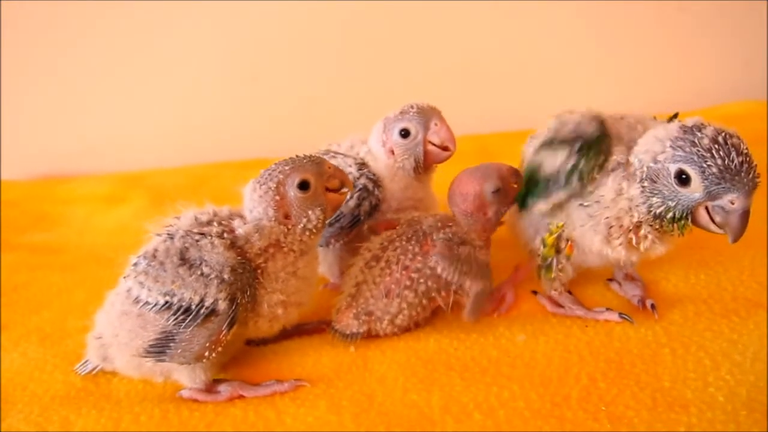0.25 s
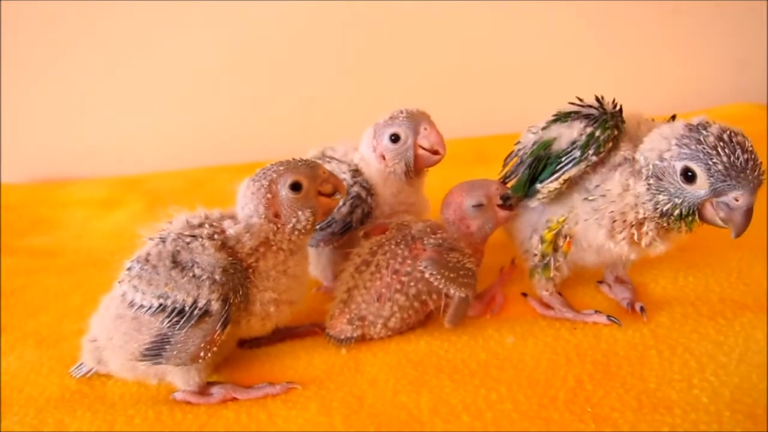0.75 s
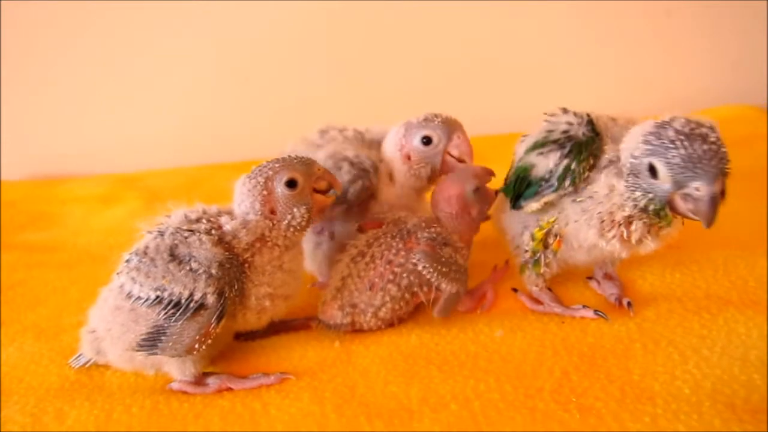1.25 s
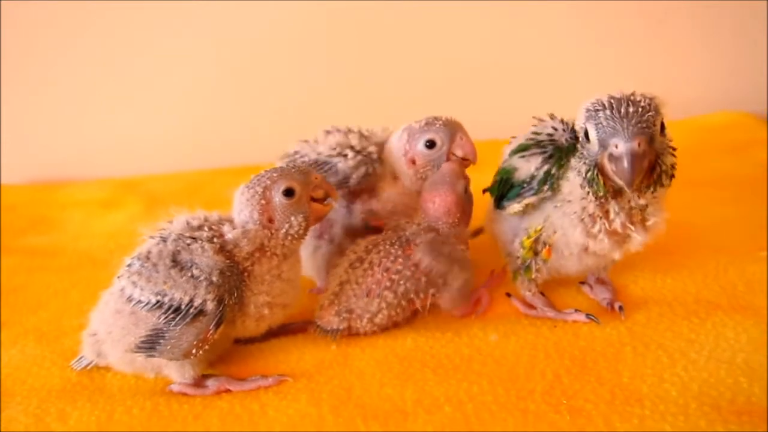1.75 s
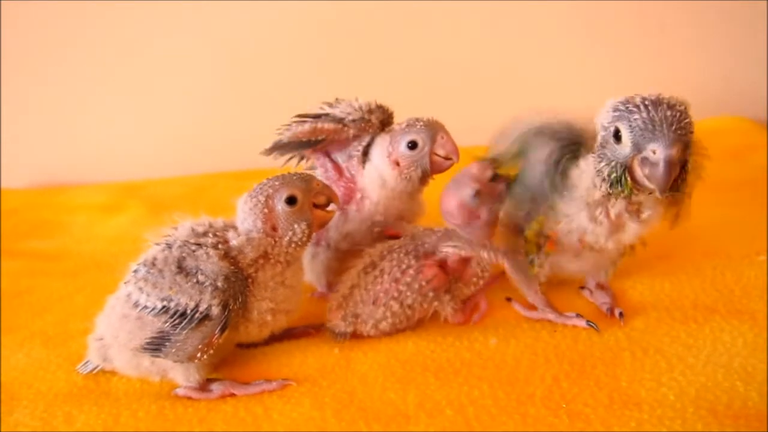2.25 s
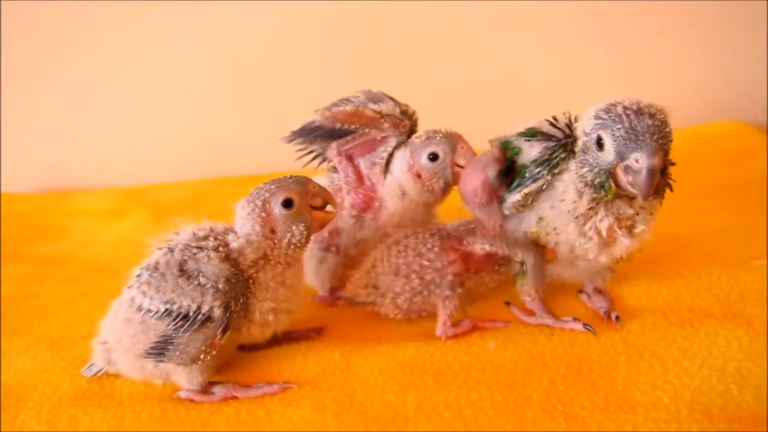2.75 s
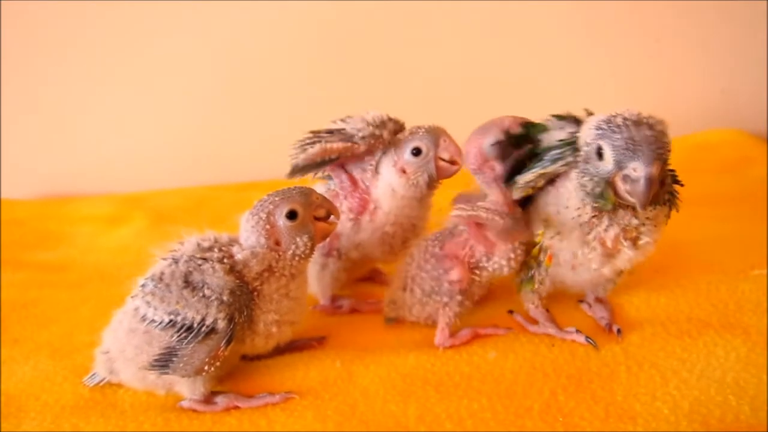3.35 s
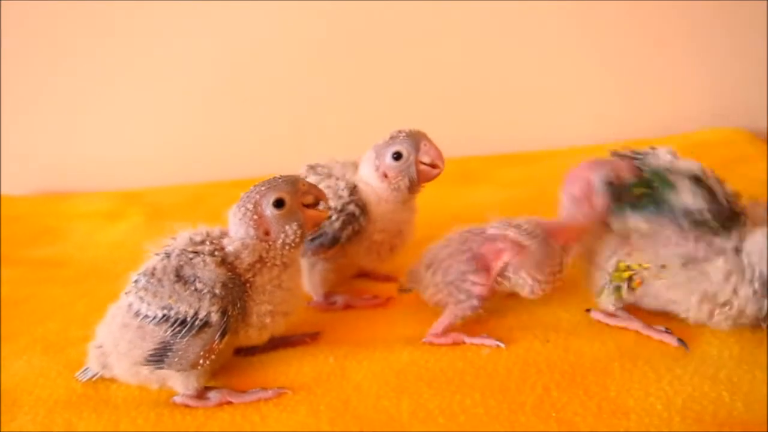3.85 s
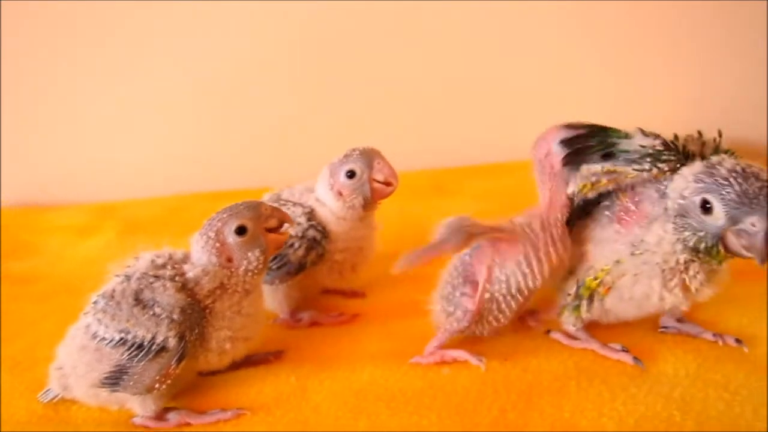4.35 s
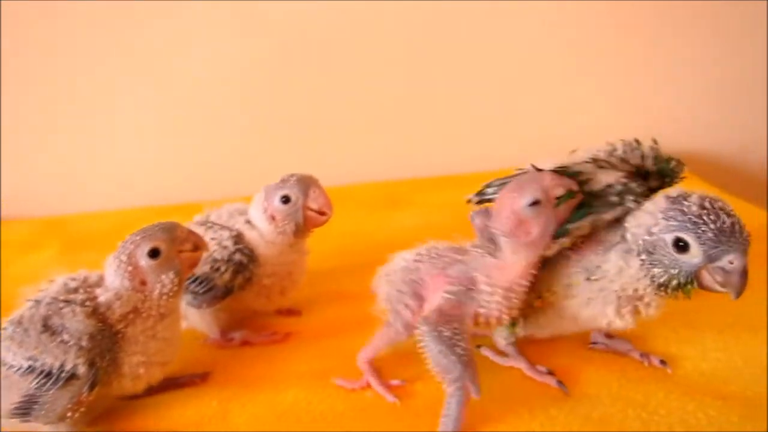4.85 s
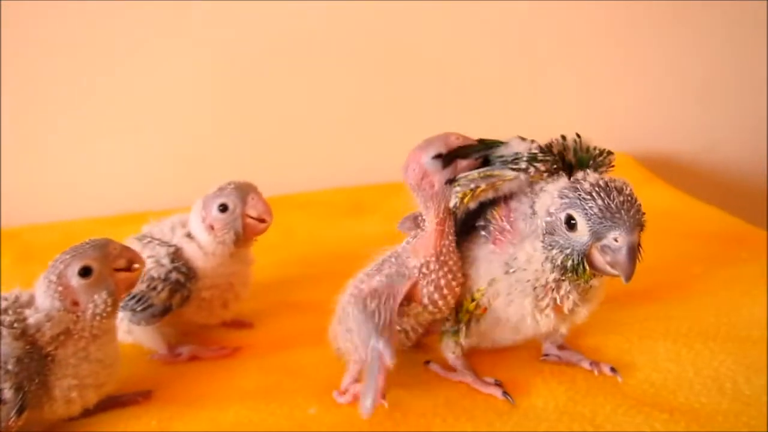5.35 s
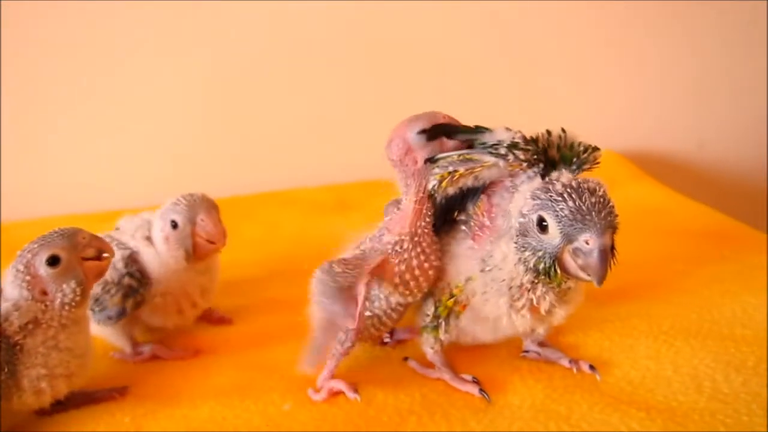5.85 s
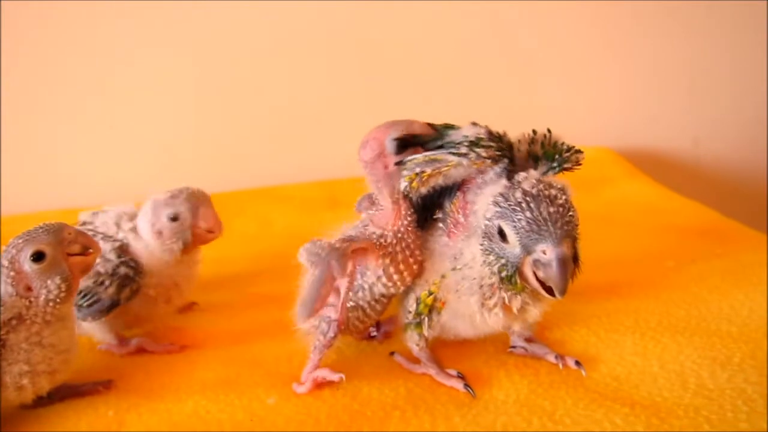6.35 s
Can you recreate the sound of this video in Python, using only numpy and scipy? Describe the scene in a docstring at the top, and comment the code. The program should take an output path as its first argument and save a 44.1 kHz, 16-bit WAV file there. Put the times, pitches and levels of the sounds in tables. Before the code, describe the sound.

Close, bright stereo sound of parrot chicks begging in a small, quiet room with a short reflective tail. From 0 to 0.5 s, five harsh, hoarse squeals fire off, each under a tenth of a second, sweeping up to a very high peak and falling. After a pause, four more raspy ones come at 0.97-1.3 s. At 1.72 s a long unbroken run begins, about nine squeals per second until 5.05 s, gradually clearing into thin, fluttering whistles with brief croaky onsets. Between roughly 2 and 4.3 s, faint low peeps fill the gaps. Soft cloth thuds with tiny claw ticks occur near 3.6 and 4.0 s. After a short silence, squeals resume at 5.46 s, four quick ones and then less evenly spaced, slightly rougher towards 6.6 s; light bumps come around 5.6-5.7 and 6.3 s. Low room rumble, hiss and faint hum lie underneath.

```python
"""Begging parrot chicks in a small room

Quick runs of short, arched squeals, hoarse at first and then clearer: each a frequency-modulated
oscillator plus breath noise, opened by a rattling croak, climbing to a whistle that flutters at its
highest pitch, then dropping away. A throat filter colours it; near surfaces and a noise tail answer.
Faint peeps fill some gaps, decaying noise makes bumps on a blanket; the room hisses and hums faintly."""
import sys
import numpy as np
from scipy import signal
from scipy.fft import rfft, irfft, next_fast_len
from scipy.io import wavfile
from scipy.ndimage import uniform_filter1d, map_coordinates

SR = 44100
rng = np.random.default_rng(int(sys.argv[2]) if len(sys.argv) > 2 else 0)


def generate_wav(sig):
    """Save sig (samples, or channels by samples) to the path in sys.argv[1] as 16-bit PCM at SR."""
    pcm = np.round(np.clip(np.atleast_2d(sig).T, -1, 1) * 32767).astype(np.int16)
    wavfile.write(sys.argv[1], SR, pcm)


N = 291942

# squeals: [start t/s, length/s, crest f/Hz, relative crest level/dB]
SQUEAL_LIST = [(.038, 0.081, 5980, -11), (0.13, 0.077, 6210, -10.5), (0.225, .074, 6155, -12.5),
               (0.321, 0.075, 6100, -12), (0.428, 0.07, 6260, -11.5), (.967, 0.072, 6180, -9.5),
               (1.053, .075, 6080, -9), (1.147, .072, 6140, -10), (1.242, 0.07, 6040, -10.5),
               (1.72, 0.076, 6090, -9), (1.809, 0.08, 6250, -11), (1.902, 0.079, 5880, -11),
               (2.007, 0.065, 5830, -10.5), (2.118, 0.068, 5904, -9), (2.221, 0.064, 5690, -12),
               (2.329, 0.069, 5864, -9.5), (2.433, 0.07, 5990, -9.5), (2.544, .068, 5880, -9),
               (2.652, 0.078, 6164, -11.5), (2.77, 0.078, 6285, -11), (2.877, 0.072, 5770, -11.5),
               (2.992, .071, 5850, -10.5), (3.108, 0.075, 6310, -9.5), (3.234, .074, 6134, -8.5),
               (3.358, .068, 6230, -9), (3.464, 0.068, 5980, -8.5), (3.597, 0.075, 6330, -11.5),
               (3.713, 0.078, 6440, -11.5), (3.822, .07, 6060, -11), (3.93, .063, 5540, -11.5),
               (4.048, 0.072, 6193, -10.5), (4.153, 0.064, 5647, -9), (4.273, .065, 6140, -10),
               (4.386, 0.067, 5960, -10.5), (4.495, .068, 5930, -10.5), (4.621, .071, 6220, -11),
               (4.742, 0.075, 6320, -13), (4.869, .07, 6000, -11.5), (4.987, 0.063, 5564, -12.5),
               (5.46, 0.076, 6335, -10), (5.552, 0.076, 6200, -8.5), (5.647, .07, 5996, -8),
               (5.756, .064, 5615, -9.5), (5.907, 0.076, 6510, -9.5), (6.027, 0.073, 6380, -9.5),
               (6.153, .073, 6250, -8.5), (6.344, .072, 6540, -9), (6.448, 0.076, 6280, -9.5),
               (6.587, 0.074, 6030, -8.5)]
SIDES = np.array([[.5], [-.5]])  # left, right share of a left-minus-right difference


def amp(db):
    """Decibels to gain."""
    return 10 ** (np.asarray(db) / 20)


def unit(x):
    """Scale to rms 1."""
    return x / np.sqrt(np.mean(x ** 2) + 1e-20)


def at(curve, where):
    """Read a curve of (place, value) points joined by straight lines."""
    return np.interp(where, *np.transpose(curve))


def along(points, hz, axis=1):
    """Read one column of a frequency table on a log axis."""
    table = np.transpose(points)
    return np.interp(np.log(hz + 1), np.log(table[0] + 1), table[axis])


def filtered(x, response):
    """Multiply the spectrum of x by a complex response of frequency."""
    m = next_fast_len(N + SR // 2)
    return irfft(rfft(x, m) * response(np.fft.rfftfreq(m, 1 / SR)), m)[..., :N]


def wobble(t, rate):
    """Smooth random curve with rate knots a second."""
    return map_coordinates(rng.standard_normal(1024), [t * rate], mode="wrap")


def turns(hz):
    """Phase/rad of an oscillator that follows a pitch curve."""
    return 2 * np.pi * np.cumsum(hz) / SR


def room_tone(level_db, hiss_db, hum_hz, hum_db):
    """Low shaped noise largely common to both sides, slightly stronger white hiss, fainter wavering hum."""
    # noise spectrum: [f/Hz, relative density/dB]
    floor = [(25, -8.5), (60, -10), (120, -10), (200, -14), (300, -9.5), (450, -14), (750, -15),
             (1100, -20), (2000, -22), (3500, -49.5), (7000, -79.5)]
    # slow drift of the room tone: [t/s, relative level/dB]
    tone_level = [(0.0, -72), (0.46, -77.5), (1.05, -75), (2.43, -77), (3.8, -74), (5.11, -80.5),
                  (6.36, -72), (6.62, -77)]
    t = np.arange(N) / SR
    air = rng.standard_normal(N) + 0.3 * rng.standard_normal((2, N))
    rumble = unit(filtered(air, lambda hz: amp(along(floor, hz)) * hz / np.hypot(hz, 45)))
    hum = amp(hum_db + 2.7 * wobble(t, 8.3)) * np.sin(turns(hum_hz + 3 * wobble(t, 5.9)))
    hiss = amp(hiss_db) * rng.standard_normal((2, N))
    return amp(level_db + at(tone_level, t)) * (rumble + hum + hiss)


def bumps(thud_band_hz, thud_t60_s, tick_t60_s):
    """Feet and bodies on cloth: decaying low noise thuds, each with a white-noise claw tick."""
    # bumps: [t/s, thud level/dB, claw tick level/dB], levels before decay
    bump_list = [(3.579, -53, -52), (4.017, -57, -50.5), (5.608, -53, -56.5), (5.698, -55, -47),
                 (6.272, -49.5, -60.5)]
    thuds, ticks = np.zeros(N + SR), np.zeros(N + SR)
    t = np.arange(SR // 4) / SR
    for start_s, thud_db, tick_db in bump_list:
        i = round(start_s * SR)
        push = unit(wobble(t, 2 * thud_band_hz)) * (1 - np.exp(-t / 0.0017))
        thuds[i:][:len(t)] += amp(thud_db - 60 * t / thud_t60_s) * push
        ticks[i:][:len(t)] += amp(tick_db - 60 * t / tick_t60_s) * rng.standard_normal(len(t))
    return (thuds + ticks)[:N]


def room(x, build_s, alike):
    """Diffuse noise tail that builds up, then dies at its own speed for each frequency."""
    # reverberation: [f/Hz, t60/s]
    decay = [(300, .2), (1000, 0.6), (2600, 0.53), (5400, 0.39), (6800, .33), (10000, 0.31), (15000, 0.1)]
    length = SR * 3 // 4
    noise = rng.standard_normal((2, length)) + alike * rng.standard_normal(length)
    hz, t, z = signal.stft(noise, SR, nperseg=256)
    envelope = amp(-60 * t / along(decay, hz)[:, None]) * (1 - np.exp(-t / build_s))
    tail = signal.istft(z * envelope, SR, nperseg=256)[1]
    return signal.fftconvolve(x[None], tail / np.linalg.norm(tail[0]), axes=1)[:, :N]


def walls(x):
    """Near surfaces return each sweep a moment later, so that it beats with itself."""
    # early echoes: [delay/s, level/dB]
    echoes = [(.0095, -22.5), (0.0115, -41), (0.025, -23.5)]
    return filtered(x, lambda hz: 1 + sum(amp(db) * np.exp(-2j * np.pi * hz * delay_s)
                                          for delay_s, db in echoes))


def ports(x):
    """Two microphone ports hear the birds with slightly different colour and phase."""
    # port difference: [f/Hz, left minus right level/dB, left phase lead/rad]
    contrast = [(500, -1.5, 0), (2400, -0.4, 0.8), (3200, -4.5, 0.82), (4120, -4.5, -0.73),
                (5200, -0.5, -0.63), (7000, -0.8, -.3), (9300, 1.1, -0.75), (11500, -2, -1.3),
                (12600, -7, -1.6), (15000, -2.5, -1.2)]
    return filtered(x, lambda hz: amp(SIDES * along(contrast, hz))
                    * np.exp(1j * SIDES * along(contrast, hz, axis=2)))


def peeps(level_db, base_hz, after_s, length_s):
    """Faint falling peeps with an octave, after the squeals of one stretch of the long run."""
    # stretch with peeps: [from t/s, to t/s]
    stretch = (2.0, 4.3)
    out = np.zeros(N + SR)
    t = np.arange(SR // 16) / SR
    u = np.clip(t / length_s, 0, 1)
    for start, length, *_ in SQUEAL_LIST:
        end = start + length
        if stretch[0] < end < stretch[1]:
            glide = 1.08 - 0.11 * u + 0.041 * wobble(t, 200)
            # pitch scatters from peep to peep
            phase = turns(base_hz * (1 + 0.037 * rng.standard_normal()) * glide)
            gain = amp(level_db - 1.3 * (end - stretch[0]) + 2.5 * rng.standard_normal())
            tone = np.sin(phase) + 1.367 * np.sin(2 * phase)
            out[round((end + after_s) * SR):][:len(t)] += gain * np.sin(np.pi * u) * tone
    return out[:N]


def arch(u, shoulder_hz, crest_hz, hoarse, knee_hz):
    """Pitch/Hz over a squeal: quick climb, rounded top and, past the knee, a steep drop."""
    # final drop: [progress (1 crest, 2 end), f/Hz]
    fall = [(1.879, 3617), (2, 2820), (2.199, 2070)]
    shoulder_u = .62
    climb = [(0, 1417), (.14, 3042), (.36, 4500 - 450 * hoarse), (shoulder_u, shoulder_hz)]
    rising = crest_hz - (crest_hz - shoulder_hz) * np.abs((1 - u) / (1 - shoulder_u)) ** 1.2
    sinking = crest_hz - (crest_hz - knee_hz) * np.abs((u - 1) / 0.69) ** 1.9
    after_crest = np.where(sinking > knee_hz, sinking, at([(1.75, knee_hz), *fall], u))
    pitch = np.select([u < shoulder_u, u < 1], [at(climb, u), rising], after_crest)
    return uniform_filter1d(pitch, size=90)


def squeal(start, crest, end, shoulder_hz, crest_hz, rise_db, crest_db, hoarse, bright_db, croak_db):
    """One push of air through the syrinx, before the throat shapes it."""
    t = np.arange(SR // 8) / SR
    # progress: 0 start, 1 crest, 2 end
    u = np.where(t < crest - start, t / (crest - start), 1 + (t + start - crest) / (end - crest))
    hoarse = np.clip(hoarse, 0, 1)
    pitch = arch(u, shoulder_hz, crest_hz, hoarse, knee_hz=4820)

    # low-crested squeals lock into their whistle later; clear ones leap in level there
    lock = np.interp(crest_hz, [5700, 6400], [.66, .47])
    effort_db = np.interp(
        u, [0, .17, lock - .03, lock + 0.063, 1, 1.45, 1.82, 2.05, 2.25],
        [rise_db - 14.5, rise_db - 3 + 4 * hoarse, rise_db,
         (rise_db + 3 * crest_db) / 4 - 5.0 * hoarse,
         crest_db + .5, crest_db + 1, crest_db - 1, crest_db - 15.5, -60])

    # membranes rattle until lock; a hoarse voice starts cleaner and breaks up on the way to the crest
    unlocked = np.interp(u - lock, [-.08, .03], [1, 0]) * (1 - hoarse)
    harsh = np.clip(2 * hoarse - .8, 0, 1)  # only the hoarsest stay broken through the top
    breakup = hoarse * np.interp(u, [.25, .45, .65, .9], [0.2, 0.933, 0.99, 0.14])
    broken_top = harsh * np.interp(u, [.65, .9, 1.5, 1.75], [0.053, 0.55, .65, 0.41])
    rough = unlocked + breakup + broken_top

    # the highest pitches flutter
    flutter_depth = np.clip((pitch - 5900) / 400, 0, 1) * (1 - hoarse)
    flutter = flutter_depth * np.sin(turns(560 * (1 + 0.35 * wobble(t, 260))))
    drift = 1 + .003 * wobble(t, 250) + .045 * flutter + .075 * rough * wobble(t, 400)
    phase = turns(pitch * drift + 380 * rough * wobble(t, 1299))

    # hoarse climb: period doubling adds 1.5 f; near the top: a second band a fourth lower
    doubled = np.interp(u, [.2, .3, .55, .7], [0, .6, .6, 0]) * np.sin(1.5 * phase)
    lower_gain = np.interp(u, [.6, .8, 1.35, 1.6], [0.16, 0.35, 0.9, 0.067])
    lower = lower_gain * np.sin(3 / 4 * phase + wobble(t, 700))

    # near lock, modulation at every third or fourth cycle throws side bands
    split = np.interp(u - lock, [-.1, .03, .35, .8], [0, 1, .7, 0])
    split = split * np.clip(3 * hoarse - .3, 0, 1) * rng.uniform(.4, 1.3)
    divided = np.sin(phase / rng.choice([3, 4]) + 0.46 * wobble(t, 300))
    bands = np.minimum(split, 1) * (1 - harsh / 2) * divided
    rattle_hz = np.interp(u, [0, .55], [700, 1150]) * (1 + .2 * wobble(t, 350))
    rattle = unlocked * np.sin(turns(rattle_hz))
    swell = amp(5.5 * rattle + 4 * bands + 1.8 * rough * wobble(t, 1200)
                + 2.2 * flutter - 2.5 * rough ** 2)
    phase = phase + 1.16 * rattle + .4 * bands

    # the octave flickers, and fades on the drop, less so in a hoarse voice
    low_db = np.interp(u, [.17, .28, 1], [0, -14, 0]) - 24 + 21 * np.sqrt(hoarse)
    high_db = -9.0 + 0.62 * bright_db - 12.5 * hoarse
    high = np.interp(pitch, [3900, 4700], [0, 1])
    fade_db = (1.5 - hoarse) * np.interp(u, [1.55, 1.85], [0, 9])
    overtone = amp((1 - high) * low_db + high * high_db + 3.0 * wobble(t, 450) - fade_db)
    tone = np.sqrt(2) * (np.sin(phase) + hoarse ** 2 * doubled + harsh * lower
                         + overtone * np.sin(2 * phase))

    # airflow rises steeply on the climb
    flow = np.interp(u, [0, .2, .45, 1.2, 1.8], [.15, 0.18, 1.155, 1.09, 0.53])
    hiss_gain = amp(0.37 * bright_db - 5.0 + 4.85 * np.sqrt(hoarse) + 5.4 * rattle)
    hiss = (0.2 + 0.73 * rough) * flow * hiss_gain * rng.standard_normal(len(t))

    # short, low opening croak
    croak_shape = np.interp(t, [0, .002, .009, .024], [0, 0.9, 0.85, 0.073])
    croak_tone = np.sin(turns(1010 + 12000 * t + 260 * wobble(t, 700)))
    croak = amp(croak_db + 30.5) * croak_shape * croak_tone
    gate = np.clip(t / 0.001, 0, 1) * (u < 2.25)
    return amp(effort_db) * (swell * tone + hiss) * gate + croak


def beg(start, length, crest_hz, crest_db):
    """One squeal: arch from its length and crest, grain from the state of the voice."""
    # the voice clears during the long run: [t/s, hoarseness (clipped to 0-1)]
    hoarseness = [(0, 0.99), (1.25, 1.01), (1.72, .48), (2.7, 0.27), (4.4, .1), (5.5, 0.21), (6.6, 0.36)]
    # clear squeals are pointed, half-hoarse flat-topped, harsh ones sag: [hoarseness, usual shoulder f/Hz]
    shoulder = [(0, 5180), (.42, 5680), (1, 5020)]
    # treble of the voice: [t/s, relative brightness/dB]
    treble = [(.15, 2.5), (.33, 8), (1.1, -7.5), (1.72, 11.5), (1.92, 1.5), (2.22, 12.5), (2.43, -7.5),
              (3.1, -1.5), (3.47, -5), (4.04, 2), (4.16, -11), (4.4, -9.5), (4.8, -0.5), (5.5, -3),
              (6.35, 4), (6.6, -4)]
    # opening croak: [t/s, relative level/dB]
    croak_level = [(0, -56), (2, -60.5), (2.4, -52), (3, -54), (3.2, -41), (3.55, -52), (4.5, -54),
                   (4.85, -43), (5.5, -54), (6.1, -48), (6.6, -52)]
    crest_share = .7  # of the length, before the crest
    usual_crest_hz, shoulder_follows = 6000, .4
    climb_db, climb_growth_db_per_s = -8, 0.53  # climb re crest; the chicks lean in harder with time
    hoarse = np.clip(at(hoarseness, start), 0, 1)
    shoulder_hz = at(shoulder, hoarse) + shoulder_follows * (crest_hz - usual_crest_hz)
    rise_db = crest_db + climb_db + climb_growth_db_per_s * start
    return squeal(start, start + crest_share * length, start + length, shoulder_hz, crest_hz,
                  rise_db, crest_db, hoarse, at(treble, start), at(croak_level, start))


def bounce(note):
    """The nearest surface returns the sweep; the path to each port is drawn anew per squeal."""
    lags = (SR * (rng.uniform(.0022, .0038) + .00003 * rng.standard_normal(2))).astype(int)
    return np.array([note + .3 * np.pad(note, (lag, 0))[:len(note)] for lag in lags])


def chicks():
    """All the squeals, panned as the caller turns and shifts, through the throat and beak filter."""
    # throat and beak: [f/Hz, relative gain/dB]
    throat = [(150, -62.5), (500, -32), (850, -33), (1130, -24.5), (1500, -26), (2000, -19), (3000, -15.5),
              (4200, -8), (5200, -1.5), (6100, -1.5), (7100, -0.5), (8200, -14.5), (9300, -3),
              (12000, -6.5), (15500, -17)]
    # pan, used less the mean of its points: [t/s, left minus right level/dB]
    pan = [(0.0, -1.5), (0.18, -2.5), (0.39, -1), (3.26, -1.5), (3.69, -4), (4.72, -1.5), (4.76, -5),
           (4.92, -2.5), (6.62, -1.5)]
    voice = np.zeros((2, N + SR))
    centre_db = np.mean(pan, axis=0)[1]
    for start, length, crest_hz, crest_db in SQUEAL_LIST:
        note = bounce(beg(start, length, crest_hz, crest_db))
        note = note * amp((at(pan, start) - centre_db) * SIDES)
        voice[:, round(start * SR):][:, :note.shape[1]] += note
    return filtered(voice[:, :N], lambda hz: amp(along(throat, hz)))


def scene():
    """The chicks close by, the room behind them."""
    voice = amp(-2.0) * chicks() + peeps(level_db=-59, base_hz=687, after_s=0.016, length_s=0.029)
    # the highest notes are beamed past the microphone and reach it more by way of the room
    spill = filtered(voice.mean(axis=0), lambda hz: amp(np.interp(hz, [6500, 10000], [-19.5, -15])))
    near = ports(walls(voice)) + bumps(thud_band_hz=188, thud_t60_s=0.049, tick_t60_s=0.012)
    tail = room(spill, build_s=0.011, alike=1.0)
    return near + tail + room_tone(level_db=5, hiss_db=2.5, hum_hz=58, hum_db=-9)


def record(dry):
    """Brick-wall low-pass: nothing passes at or above the band limit."""
    top_hz = 15750
    return filtered(dry, lambda hz: hz < top_hz)


dry = scene()
out = record(dry)
generate_wav(out)
```